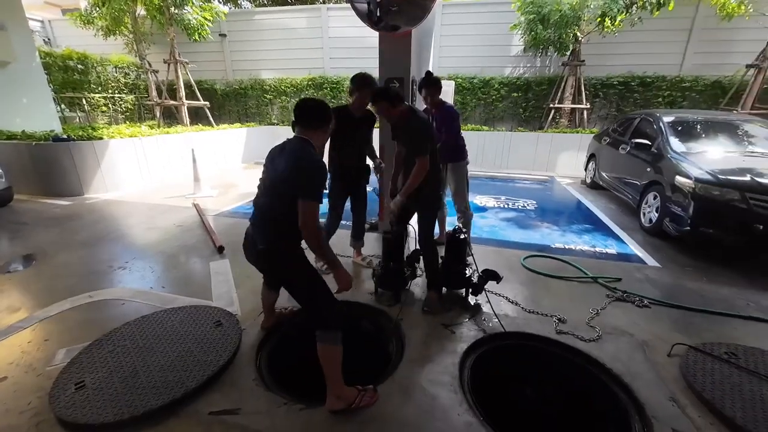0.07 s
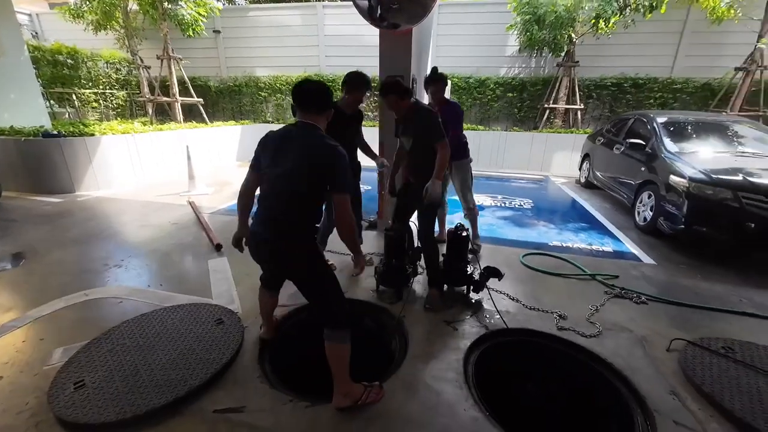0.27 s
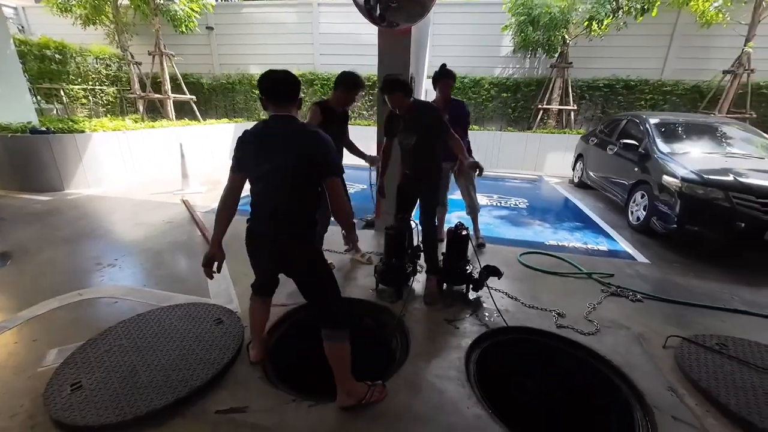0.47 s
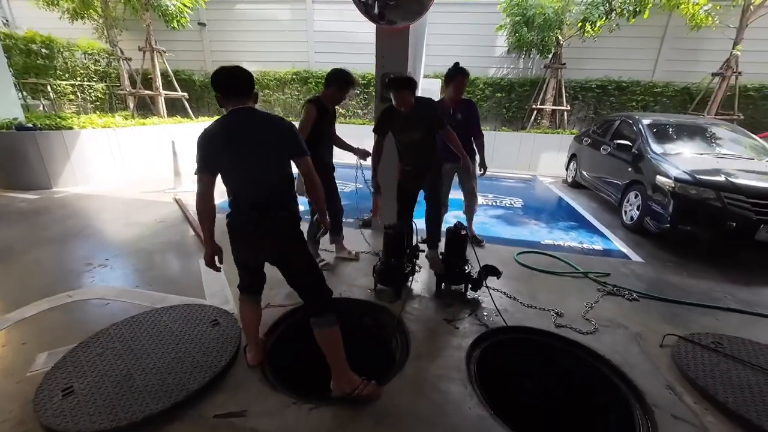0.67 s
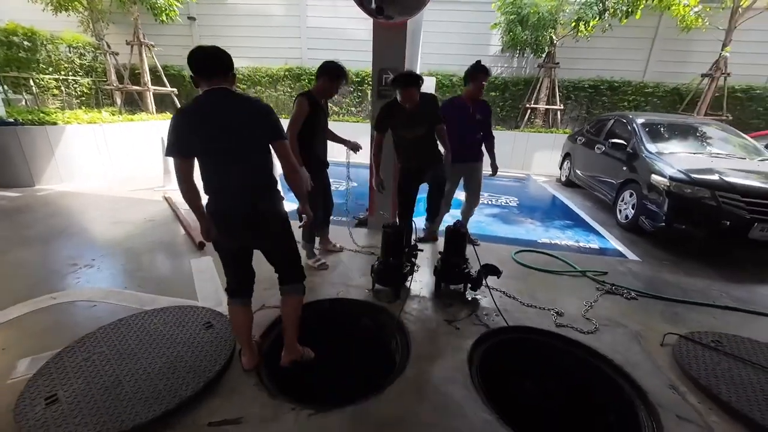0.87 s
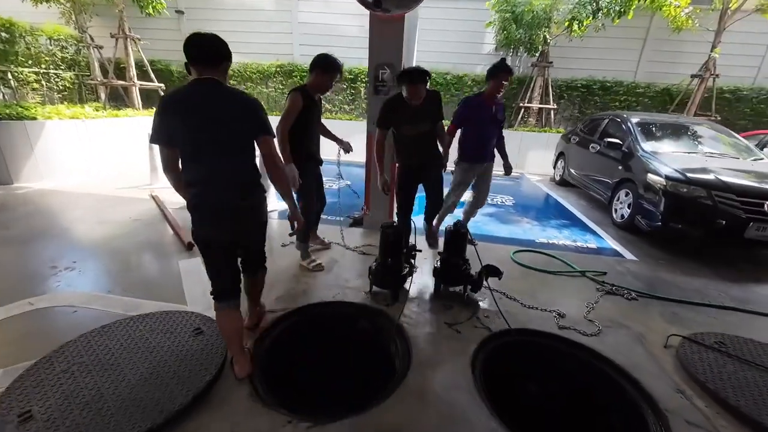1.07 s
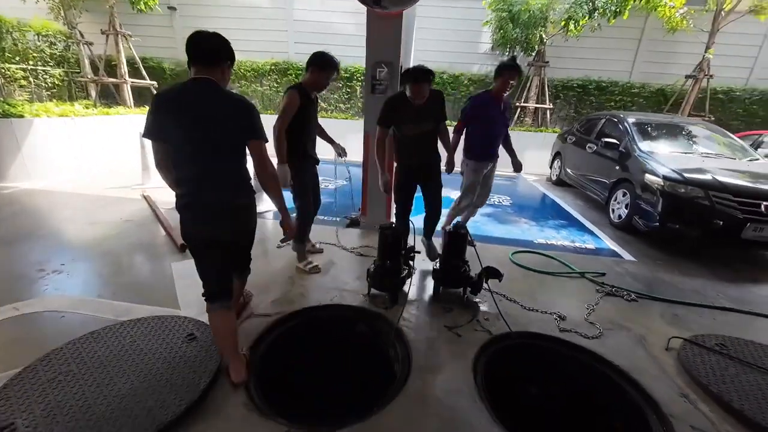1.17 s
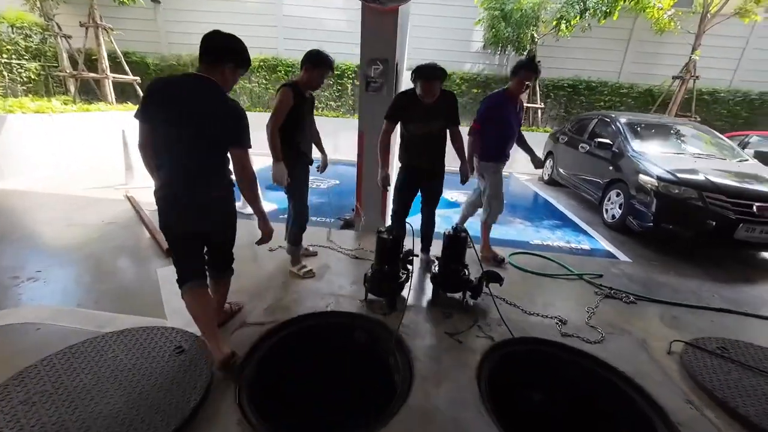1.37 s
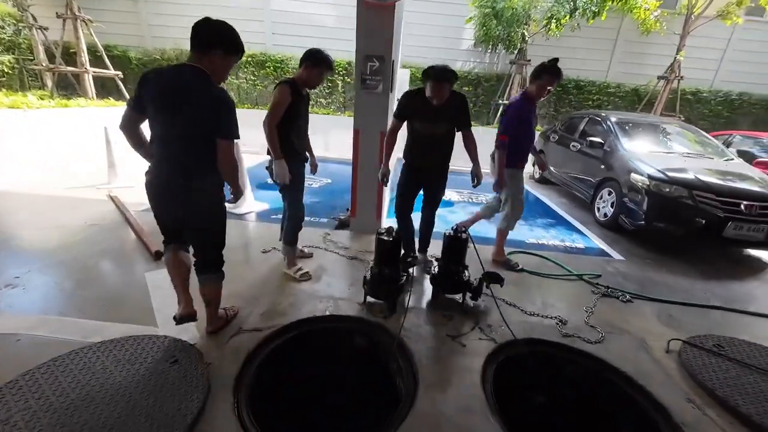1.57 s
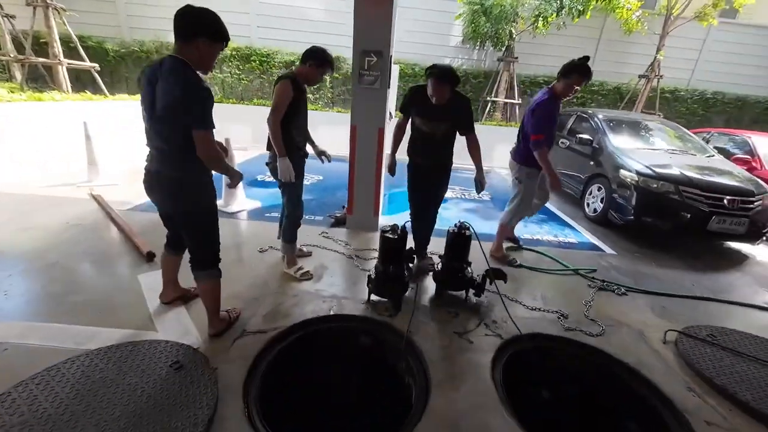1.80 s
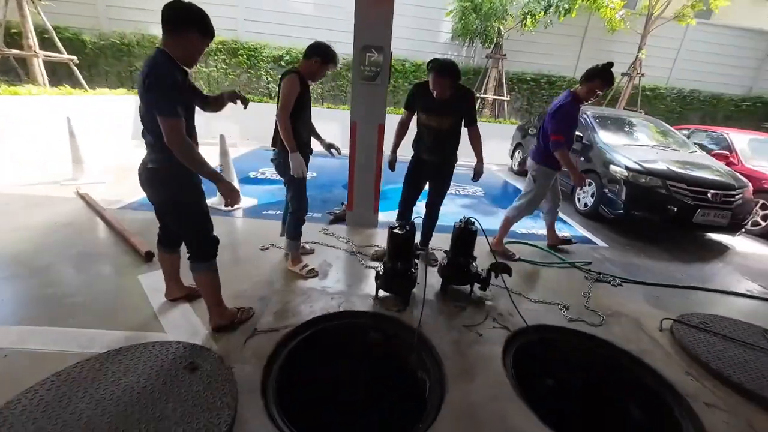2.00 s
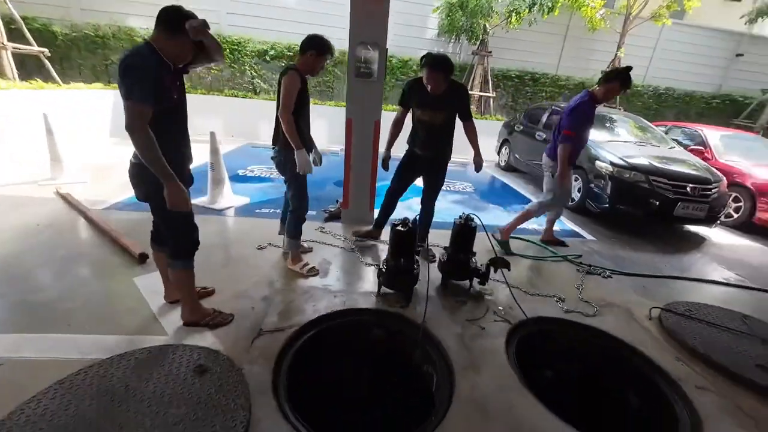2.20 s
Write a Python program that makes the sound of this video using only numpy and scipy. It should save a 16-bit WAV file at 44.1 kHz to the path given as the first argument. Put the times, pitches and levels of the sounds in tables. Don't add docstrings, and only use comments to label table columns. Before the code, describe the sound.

Steel chain links rattle and clink sharply on concrete, thin out to a quiet lull, then burst back loudly as a heavy pump is shoved, grinding and knocking; close stereo microphone in an open, slightly echoing car park.

```python
import sys
import numpy as np
from scipy import signal
from scipy.fft import rfft, irfft, next_fast_len
from scipy.io import wavfile

SR = 44100
rng = np.random.default_rng(int(sys.argv[2]) if len(sys.argv) > 2 else 0)


def generate_wav(signal):
    frames = np.transpose(np.atleast_2d(signal))
    scaled = np.clip(frames, -1, 1) * 32767
    pcm = np.round(scaled).astype(np.int16)
    wavfile.write(sys.argv[1], SR, pcm)


def volts(x):
    e = np.asarray(x, float) / 20
    return 10 ** e


N = 99048

# start_s, rattle level_db
CHAIN_PULL = [(0, -43), (.09, -45.5), (.16, -25), (.3, -25.5), (.4, -21), (.55, -33), (.69, -40),
              (.83, -36.5), (.96, -43.5), (1.37, -55), (1.41, -32.5), (1.55, -17.5), (1.65, -19.5),
              (1.7, -29.5), (1.79, -24.5), (2.07, -39.5), (2.11, -26.5), (2.25, -28.5)]
# start_s, peak_db
LINK_STRIKES = [(.102, -13), (.1545, -3), (.247, -9), (.384, -8), (.396, -9), (.7, -10), (.808, -17),
                (.828, -19), (.889, -18), (1.052, -24), (1.1228, -18), (1.145, -22), (1.192, -27),
                (1.301, -24), (1.356, -17), (1.39, -15), (1.462, -4), (1.503, 0), (1.573, -2), (1.611, 0),
                (1.781, -8), (1.835, -8), (2.096, -8), (2.198, -4)]
# pitch_hz, level_db, fade_s (time to fall 60 dB)
LINK_TONES = [(6450, -17, .06), (8300, -18, .03), (10300, -10, .015), (11200, -10, .015), (12940, -2, .08),
              (13390, 0, .08), (13740, 0, .08), (14690, -2, .08)]
# start_s, peak_db, pitch_hz
LINK_RINGS = [(0.001, -40, 4950), (0.0872, -36, 4760), (0.106, -33, 6420), (0.139, -25.5, 6510),
              (0.156, -21, 6450), (0.174, -27.5, 4770), (0.214, -25, 4780), (0.292, -24, 5000),
              (0.2044, -21.5, 4950), (0.2483, -19, 4970), (0.5412, -31.5, 4780), (0.7407, -27.5, 4810),
              (0.7966, -24, 5010), (0.9078, -27.5, 4810), (0.9494, -33.5, 4830), (1.4735, -14.5, 5050),
              (1.472, -21, 4790), (1.505, -14, 4780), (1.55, -24, 4800), (1.605, -16, 4810),
              (1.69, -24, 4790), (1.72, -24, 5000), (1.79, -23, 4820), (1.5289, -11.5, 5010),
              (1.5574, -15, 5000), (1.5894, -12.5, 4980), (1.6594, -22, 5020), (1.7489, -23, 5000),
              (1.7814, -13.5, 5030), (1.8194, -19, 4980), (1.8687, -20.5, 5010), (2.1006, -19, 4920),
              (2.1196, -23, 4940), (2.1894, -17.5, 5060)]
# start_s, peak_db, bright_db (of its upper tones)
HOOK_TAPS = [(0.037, -40, -20), (.051, -43.5, 11), (.069, -31, -3), (.093, -37, 4), (.106, -25, -4),
             (.116, -36, 2), (.139, -30.5, -2), (.154, -24, -14), (0.166, -30, -3), (.176, -29, 0),
             (.182, -31, 7), (.213, -34, 5), (0.243, -34.5, -4), (.258, -40, -7), (.3, -37, -7),
             (.381, -34, 1), (.392, -42, 10), (0.401, -34, -8), (.435, -44, -15), (.81, -35.5, -1),
             (0.841, -39, 2)]
# pitch_hz, level_db, fade_s
HOOK_TONES = [(1500, -11, .025), (2230, -7, .035), (2560, -7, .025), (2780, 3, .05), (3010, -8, .025),
              (3650, -2, .04)]
# start_s, level_db
SCRAPE_LEVEL = [(0, -65), (.15, -48.5), (.4, -47.5), (.55, -55.5), (.78, -60), (.84, -49.5), (.92, -56),
                (1.32, -64), (1.35, -38.5), (1.45, -50), (1.7, -56), (1.8, -42), (1.9, -46), (1.915, -42.5),
                (2.05, -42.5), (2.25, -38.5)]
# pitch_hz, level_db (per Hz)
SCRAPE_COLOUR = [(300, -3), (900, -2), (2500, 0), (4300, -9), (7000, -19), (12000, -30)]
# pitch_hz, level_db (per Hz)
AIR_COLOUR = [(12, -29), (20, -31), (81, 1), (149, 11), (552, -7.5), (4400, -26), (5720, -64), (9680, -120)]
# pitch_hz, likeness (1 = the same in both)
LIKENESS = [(30, 0.93), (125, 1), (1000, 1), (4000, 1), (12000, 0.73)]
# start_s, level_db
WIND_GUSTS = [
    (0, -34.5),
    (.3, -23.5),
    (.6, -36.5),
    (1.4, -37),
    (1.6, -14),
    (1.8, -38.5),
    (2.25, -30.5),
]
# start_s, height_db, length_s
FLOOR_THUMPS = [(0.247, -21.5, 0.004), (0.344, -35, 0.021), (0.933, -17, 0.018), (1.452, -15.5, 0.028),
                (1.501, -13.5, 0.011), (1.545, -12, 0.0056), (1.551, -13, 0.066), (1.61, -10.5, 0.0045),
                (1.63, -44, 0.0091), (1.65, -10, 0.059), (2.201, -23, 0.0053)]
# start_s, peak_db, main pitch_hz
CASING_KNOCKS = [(0.385, -22, 850), (0.526, -30.5, 1270), (0.7, -34, 3560), (0.829, -43, 1570),
                 (1.3345, -21.5, 2030), (1.3433, -14.5, 1140), (1.353, -33, 2000), (1.357, -18.5, 770),
                 (1.3602, -39, 1700), (1.708, -19.5, 690), (1.797, -24, 1270), (1.8, -22.5, 410),
                 (1.826, -24, 333), (1.912, -32, 2530), (2.118, -21.5, 890), (2.199, -18, 1000),
                 (2.199, -34, 1970), (2.209, -18.5, 810), (2.21, -22.5, 1730)]
# start_s, peak_db, main pitch_hz
SHOVE_JOLTS = [(1.467, -27.5, 2380), (1.465, -17.5, 410), (1.5, -15.5, 830), (1.502, -23.5, 2390),
               (1.509, -8, 864), (1.517, -21, 2340), (1.523, -22, 2720), (1.532, -9, 385),
               (1.539, -16.5, 2533), (1.547, -16.5, 2530), (1.547, -5, 415), (1.56, -24, 2510),
               (1.573, -9, 910), (1.579, -16.5, 2764), (1.584, -14, 774), (1.591, -7.5, 395),
               (1.599, -15, 940), (1.611, -11, 2456), (1.616, -14.5, 4350), (1.616, -6, 480),
               (1.627, -15.5, 3380), (1.63, -4, 4550), (1.632, -9.5, 1640), (1.637, -17, 4060),
               (1.643, -7, 1940), (1.647, -10.5, 1660), (1.652, -7, 1800), (1.662, -20.5, 1850),
               (1.666, -9, 410), (1.671, -13.5, 830)]
# start_s, level_db
PUMP_SHOVE = [
    (1.44, -44),
    (1.465, -33.5),
    (1.49, -42),
    (1.51, -26.5),
    (1.56, -28),
    (1.62, -26),
    (1.63, -14.5),
    (1.66, -22),
    (1.685, -43.5),
]
# pitch_hz, level_db
CASING_TONES = [(395, -14), (786, -2), (1290, -5), (1610, -2), (1950, -3), (2440, -7), (3100, -4),
                (3590, -4), (4380, -3)]

LEFT_RIGHT = np.array([[1], [-1]])


def rms_one(x):
    return x / np.sqrt(np.mean(x ** 2) + 1e-20)


def in_time(rows):
    return np.interp(np.arange(N) / SR, *np.transpose(rows)[:2])


def at_hz(points, hz):
    known_hz, values = np.array(points).T
    return np.interp(np.log(hz), np.log(known_hz), values)


def drift(rate):
    r = np.exp(-80 * np.pi * rate / SR)
    white = rng.standard_normal(N // 40 + 2002)
    slow = signal.lfilter([1], [1, -2 * r, r * r], white)[2000:]
    return np.interp(np.arange(N) / 40, np.arange(len(slow)), rms_one(slow))


def ring(clicks, hz, t60):
    r = volts(-60 / (t60 * SR))
    w = 2 * np.pi * hz / SR
    return signal.lfilter([0, np.sin(w)], [1, -2 * r * np.cos(w), r * r], clicks + 1e-18)


def low(x, hz):
    return signal.sosfilt(signal.butter(2, hz, fs=SR, output="sos"), x)


def band_pass(x, edges_hz):
    return signal.sosfilt(signal.butter(2, edges_hz, "band", fs=SR, output="sos"), x)


def contacts(rate, spread_db):
    size = volts(spread_db * np.minimum(rng.exponential(1, N), 4))
    return size * (rng.random(N) < rate / SR)


def sparse_noise(count, share):
    return rng.standard_normal(count) * (rng.random(count) < share)


def add(out, s, sound):
    i = int(s * SR)
    out[..., i:i + sound.shape[-1]] += sound[..., :N - i]


def banded_noise(spectrum, patchy_db):
    out = 0
    together = drift(8)
    edges = 20 * 2 ** np.arange(0, 10, .5)
    white = rng.standard_normal((2, 2, N))
    for k, (a, b) in enumerate(zip(edges, edges[1:])):
        mid, side = band_pass(white[k % 2], [a, b])
        centre_hz = np.sqrt(a * b)
        alike = np.clip(at_hz(LIKENESS, centre_hz), 0, 1)
        gain = volts(at_hz(spectrum, centre_hz) + patchy_db * (0.16 * together + drift(25.0)))
        out = out + gain * (np.sqrt(1 + alike) * mid + np.sqrt(1 - alike) * side * LEFT_RIGHT)
    return rms_one(out)


def chain():
    touches_per_s, touch_spread_db, slack_below_db, clump_db = 4000, 2.8, -36, 1.5
    rattle_db, strike_db, strike_s = 13, 9, .004
    size_spread, crack_db, crack_cut_hz, scatter_db = .0045, -21.5, 11000, 3

    pull_db = in_time(CHAIN_PULL)
    busy = np.clip(volts(pull_db - slack_below_db), .1, 1)
    touch_rate = touches_per_s * busy * volts(clump_db * drift(23))
    rattle = contacts(touch_rate, touch_spread_db) * rng.choice([-1, 1], N)
    hits = rms_one(rattle) / np.sqrt(busy) * volts(pull_db + rattle_db)
    fade = np.exp(-np.arange(900) / SR / strike_s)
    for s, db in LINK_STRIKES:
        add(hits, s, volts(db + strike_db) * fade * sparse_noise(900, .3))

    out = np.zeros((2, N))
    dealt = rng.integers(0, 8, N)
    tones = [*LINK_TONES, (4800, -17, .1), (5010, -17, .1)]
    for k in range(8):
        mine = hits * (dealt == k)
        uneven = rng.permutation(len(tones)) / len(tones) * .4
        sizes = 1 + size_spread * (uneven + k / 2.5 - 1.6)
        link = sum(volts(db - 44) * ring(mine, hz * a, t60) for (hz, db, t60), a in zip(tones, sizes))
        crack = low(np.diff(mine, prepend=0), crack_cut_hz)
        link = link + volts(crack_db) * crack
        place = (-1) ** k * (k % 3) / 2
        out += np.stack([link, np.roll(link, k % 2)]) * volts(scatter_db * place * LEFT_RIGHT / 2)
    return out


def drag():
    mid, side = band_pass(rng.standard_normal((2, N)), (210, 444))
    level_db = -27 + 0.71 * in_time(CHAIN_PULL) + 2.5 * drift(15)
    return volts(level_db) * rms_one(mid + .6 * side * LEFT_RIGHT)


def scrape():
    return volts(in_time(SCRAPE_LEVEL) + 1.5) * banded_noise(SCRAPE_COLOUR, patchy_db=1.5)


def air():
    return volts(-42.5) * banded_noise(AIR_COLOUR, patchy_db=.8)


def gusts():
    cut_hz = 39.6
    white = rng.standard_normal((2, N + 8000))
    mid, side = low(low(white, cut_hz), 2 * cut_hz)[:, 8000:]
    return volts(in_time(WIND_GUSTS) + 2.5 * drift(8)) * rms_one(mid + .45 * side * LEFT_RIGHT)


def rings():
    level_db, touch_s, pair_hz, ring_t60_s = -12.5, .008, 85, .15
    out = np.zeros((2, N))
    t = np.arange(SR // 3) / SR
    for (s, db, hz), chance in zip(LINK_RINGS, rng.uniform(-1.03, 1, (len(LINK_RINGS), 4))):
        for offset, lean in ((0, chance[0]), (chance[1], chance[2]), (-chance[1], chance[3])):
            touches = sparse_noise(len(t), .012) * np.exp(-t / touch_s)
            touches = touches / np.sqrt(np.sum(touches ** 2) + 1e-9)
            tone = ring(touches, hz + pair_hz * offset, ring_t60_s)
            gain_db = db + level_db - 6.4 * abs(offset) + 6.4 * lean * LEFT_RIGHT
            add(out, s, volts(gain_db) * np.stack([tone, np.roll(tone, int(2 * lean))]))
    return out


def hook():
    touch_s, bright_above_hz = .0025, 3300
    out = np.zeros((2, N))
    t = np.arange(SR // 5) / SR
    for s, db, bright_db in HOOK_TAPS:
        touches = sparse_noise(len(t), .03) * np.exp(-t / touch_s)
        touches = touches / np.sqrt(np.sum(touches ** 2) + 1e-9)
        chances = rng.normal(0, 1, (len(HOOK_TONES), 3))
        for (hz, level_db, t60), (strength, lean, detune) in zip(HOOK_TONES, chances):
            gain_db = db - 5.0 + level_db + 2.85 * strength + bright_db * (hz > bright_above_hz)
            gain_db = gain_db + 0.83 * lean * LEFT_RIGHT
            add(out, s, volts(gain_db) * ring(touches, hz * (1 + .006 * detune), t60))
    return out


def thumps():
    out = np.zeros(N)
    for s, db, length in FLOOR_THUMPS:
        u = np.arange(9000) / SR / length
        swing = np.sin(np.pi * u) * np.exp(-1.0 * u)
        soft_start = 1 - np.exp(-4.0 * u)
        add(out, s, -volts(db) * 2.0 * swing * soft_start)
    return out


def knocks():
    push_db, grit_db, ring_db = 8, 5.5, 4
    grit_s, side_scatter = .002, .2
    out = np.zeros((2, N))
    t = np.arange(4000) / SR
    for s, db, hz in [*CASING_KNOCKS, *SHOVE_JOLTS]:
        grit = sparse_noise(4000, .2) + side_scatter * rng.standard_normal((2, 4000))
        grit = grit * np.exp(-t / grit_s)
        t60 = .03 if 2100 < hz < 2750 else .011
        push_size = volts(push_db) * 3000 / hz / 3 * min(.6, hz / 1800)
        push = low(-push_size * (t < .3 / hz), 2 * hz)
        blow = .5 * (t == 0) + .08 * grit
        tone = sum(g * ring(blow, hz * k, t60) for k, g in ((1, 1), (1.3, .25), (.83, .3)))
        rough = band_pass(grit, [hz / 1.6, hz * 1.7])
        add(out, s, volts(db) * (push + volts(grit_db) * rough + volts(ring_db) * tone))
    return out


def pump():
    catches_per_s, spread_db, bright_above_db = 800, 3.0, -26
    casing_db, casing_t60_s, raw_db = -32.5, .03, 3
    t = np.arange(N) / SR
    force_db = in_time(PUMP_SHOVE)
    moving = (t > PUMP_SHOVE[0][0]) * (t < PUMP_SHOVE[-1][0])
    jolts = contacts(catches_per_s * volts(4.0 * drift(80)), spread_db)
    jolts = jolts / np.std(jolts) * volts(force_db) * moving
    hard = np.clip(volts(2 * (force_db - bright_above_db)), 0, 1)
    body = 0
    for hz, db in CASING_TONES:
        strength = rng.normal(0, 1, N) + rng.normal(0, 0.43, (2, N))
        push = jolts * (hard if hz > 2600 else 1) * strength
        body = body + volts(db + casing_db) * ring(push, hz, casing_t60_s)
    raw_grind = low(jolts * hard, 5500) + low(jolts * (1 - hard), 2000)
    return body - volts(raw_db) * raw_grind


def hall(x):
    t60_s, cut_hz = .35, 6000
    size = next_fast_len(N + SR)
    out = np.zeros((2, N))
    w = 2j * np.pi * np.fft.rfftfreq(size)
    dull = np.exp(-2 * np.pi * cut_hz / SR)
    for c in range(2):
        echoes = 0
        for lag in rng.uniform(0.013, 0.046, 8) * SR:
            loss = volts(-60 * lag / SR / t60_s) * (1 - dull) / (1 - dull * np.exp(-w))
            trip = loss * np.exp(-w * int(lag))
            echoes = echoes + trip / (1 - trip)
        out[c] = irfft(rfft(x, size) * echoes, size)[:N]
    return out


def scene():
    steel = chain() + rings() * volts(3.5 * drift(33)) + hook()
    heavy = (knocks() + pump()) * volts(1.8 * LEFT_RIGHT / 2)
    deep = thumps() * volts(2.2 * LEFT_RIGHT) + gusts() + drag()
    echo = volts(-17) * hall((steel + heavy).mean(axis=0))
    return steel + heavy + echo + scrape() + air() + deep


def top_cut(x):
    return signal.sosfilt(signal.butter(12, 15720, fs=SR, output="sos"), x)


def record(dry):
    top = .75
    mix = top * np.tanh(dry / top)
    mix = signal.sosfilt(signal.cheby2(12, 60, 16200, fs=SR, output="sos"), mix)
    mix = signal.sosfilt(signal.butter(1, 53, "high", fs=SR, output="sos"), mix)
    return top_cut(mix)


dry = scene()
out = record(dry)
generate_wav(out)
```